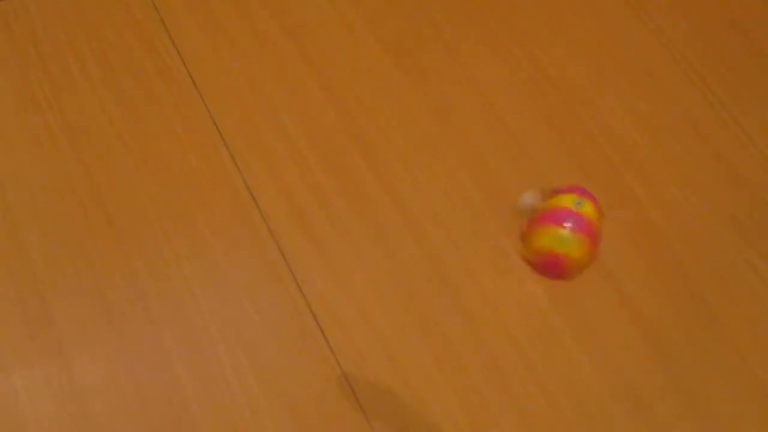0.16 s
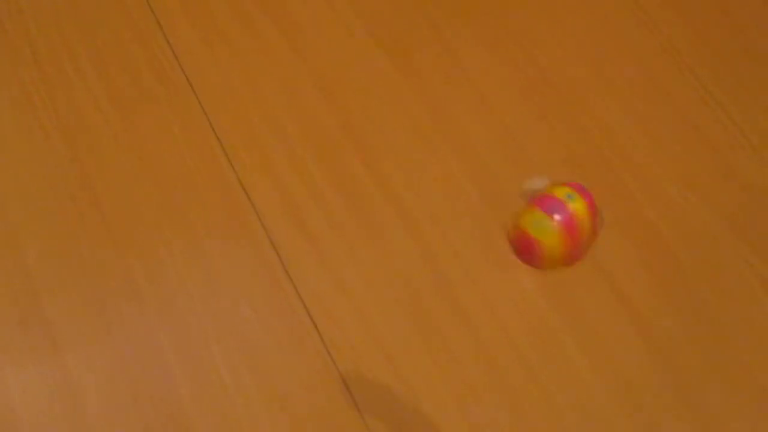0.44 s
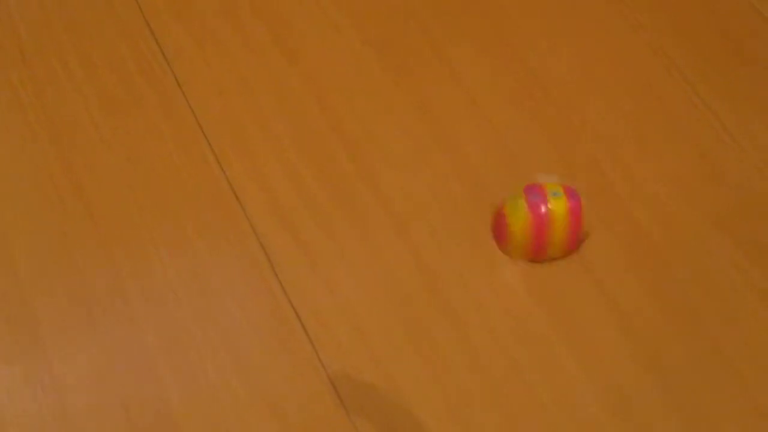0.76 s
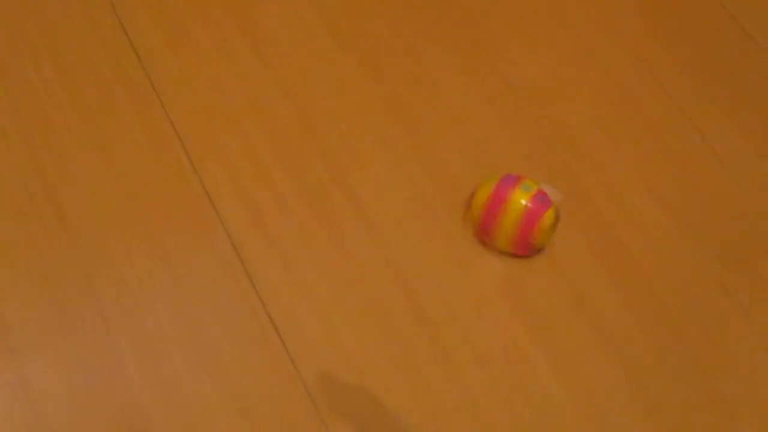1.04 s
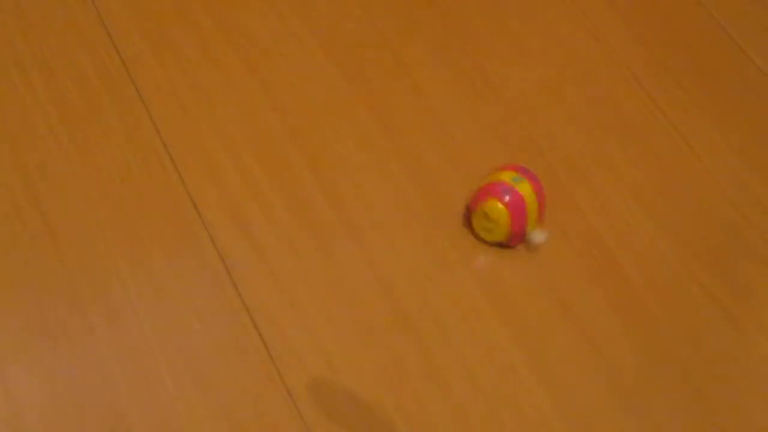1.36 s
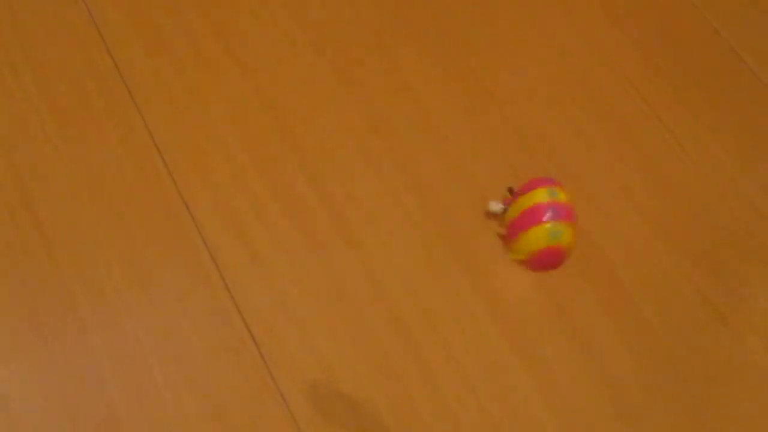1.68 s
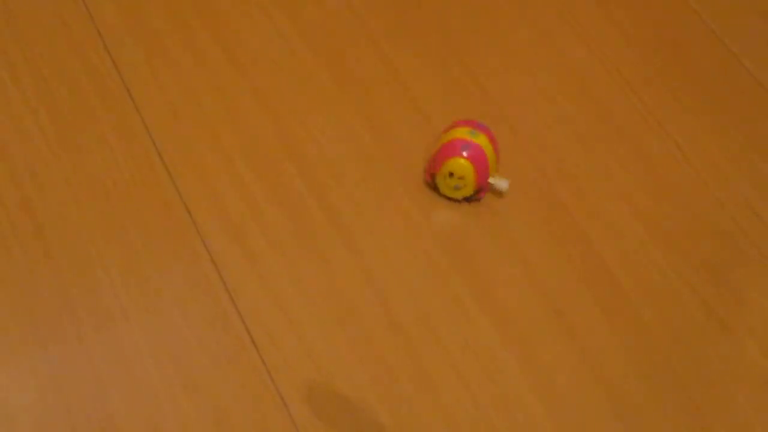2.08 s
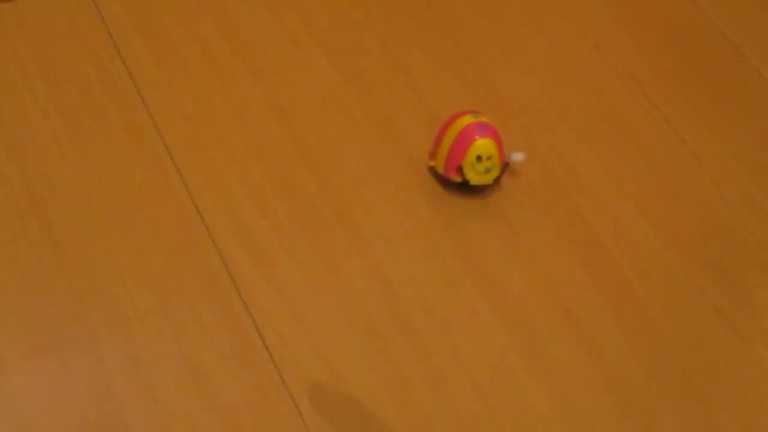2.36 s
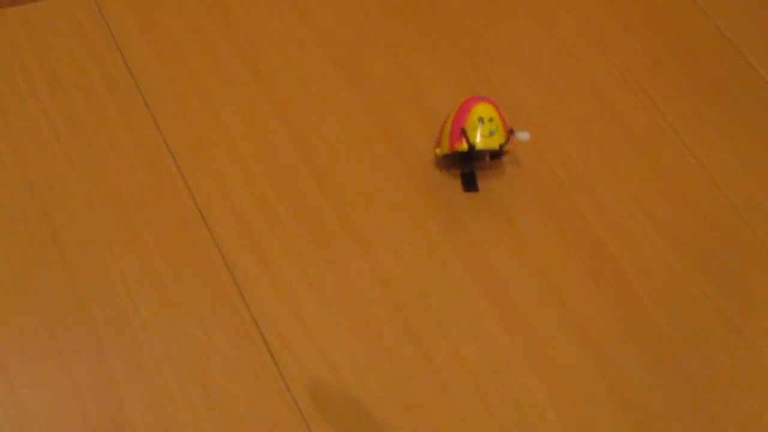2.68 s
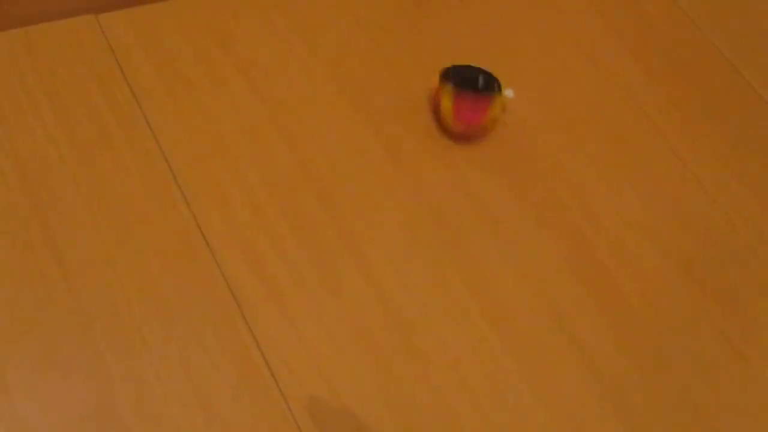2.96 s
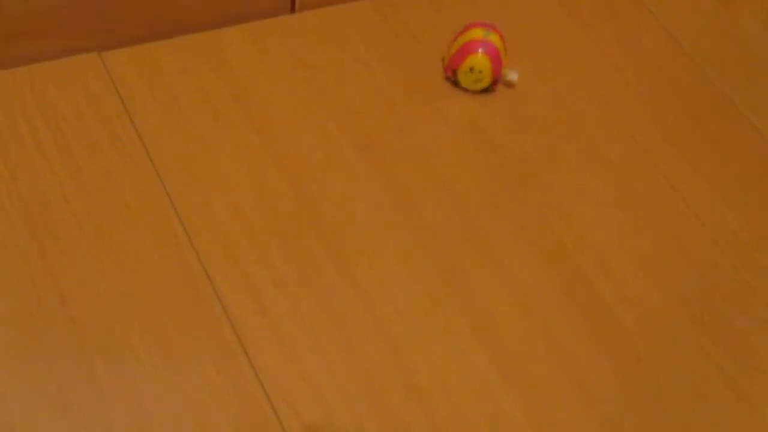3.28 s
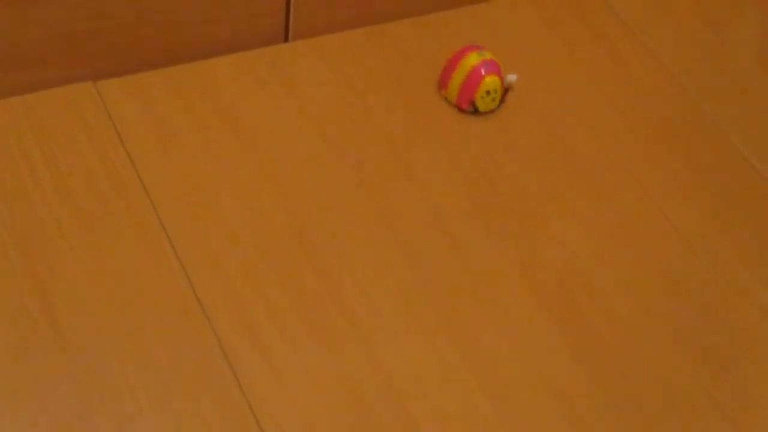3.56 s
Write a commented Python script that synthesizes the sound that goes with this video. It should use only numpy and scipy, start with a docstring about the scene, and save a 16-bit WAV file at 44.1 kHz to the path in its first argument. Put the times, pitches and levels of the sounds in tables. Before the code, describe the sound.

Close mono pickup of a clockwork toy's steady harsh whirr and faint wheel bumps on wood, then a loud crack, a slightly ducked whirr, a hard plastic knock on landing, and more whirring over low room tone.

```python
"""A clockwork toy runs in circles on a wooden table: gear clicks excite a bright hiss, shell and table modes.
Its wheels bump as it rolls, as decaying struck modes; at 2.1 s it rears up and the mode balance shifts.
At 2.7 s a sprung lever snaps, as noise cracks; a limiter ducks all sound and recovers slowly.
It tumbles and lands with a knock near 3.1 s, then whirrs on. Low noise gives a faint room tone throughout."""
import sys
import numpy as np
from scipy import signal
from scipy.fft import rfft, irfft
from scipy.io import wavfile
from scipy.ndimage import map_coordinates

SR = 44100
rng = np.random.default_rng(int(sys.argv[2]) if len(sys.argv) > 2 else 0)


def wav_record(signal):
    """Record a signal, one row per channel, as 16-bit PCM in the file named by sys.argv[1]."""
    frames = np.transpose(np.atleast_2d(signal))
    bounded = np.clip(frames, -1, 1)
    # unit amplitude maps onto the largest positive 16-bit level
    quanta = np.round(bounded * 32767).astype(np.int16)
    wavfile.write(sys.argv[1], SR, quanta)


N = 164493

# Whirr loudness. Each row: time in seconds, rms of gear hiss in dB, level of shell ring in dB,
# level of table rumble in dB.
WHIRR_LEVELS = [(0.0, -22, -31.5, -41), (0.09, -20.5, -35, -48.5), (0.17, -23, -33, -51.5),
                (0.21, -20, -32, -42), (0.31, -25, -35.5, -47.5), (0.42, -22.5, -33, -45.5),
                (0.48, -22.5, -35.5, -45.5), (0.71, -22.5, -35.5, -47), (0.78, -20.5, -37, -44.5),
                (0.84, -23.5, -34.5, -45.5), (0.89, -20, -34.5, -41), (0.94, -21.5, -35, -43),
                (0.99, -26, -37.5, -48), (1.04, -19.5, -36, -46.5), (1.08, -23, -35.5, -46),
                (1.14, -24, -36, -50), (1.18, -21.5, -35.5, -46), (1.29, -24, -36, -50),
                (1.34, -23.5, -38, -39.5), (1.42, -26, -37, -45.5), (1.49, -22.5, -37.5, -46),
                (1.73, -23, -38.5, -45), (1.96, -22.5, -35, -44.5), (2.03, -24.5, -36, -41.5),
                (2.09, -22, -35.5, -42.5), (2.19, -24.5, -33, -52.5), (2.36, -24, -32.5, -54),
                (2.41, -24.5, -33.5, -49.5), (2.56, -23.5, -31.5, -52.5), (2.67, -22, -32, -53.5),
                (2.81, -24, -36, -46), (2.85, -23, -35, -37), (2.93, -22.5, -29.5, -51),
                (3.02, -23.5, -28.5, -55.5), (3.12, -21, -30.5, -46), (3.17, -24, -32.5, -41),
                (3.26, -21, -33, -42), (3.31, -21.5, -36, -47.5), (3.42, -20.5, -38, -52),
                (3.46, -23, -37, -51.5), (3.66, -21.5, -34, -47.5), (3.73, -20.5, -38.5, -48)]
# Tooth rate of the fastest gear. Each row: time in seconds, rate in Hz.
TOOTH_RATE = [(0, 224.6), (.5, 208.6), (.85, 225.5), (1.3, 205), (1.6, 197.8), (2.0, 197.8), (2.2, 205.6),
              (2.5, 206), (2.7, 215), (2.9, 174), (3.25, 221.4), (3.73, 212.3)]
# Gear hiss spectrum. Each row: frequency in Hz, relative density in dB per Hz.
GEAR_HISS_SPECTRUM = [(2240, -58), (3800, -26), (4540, -15), (5650, -14), (7110, -8.5), (7770, -3.5),
                      (9330, 0.5), (10800, -2), (13300, -16), (15600, -25)]
# Shell modes. Each row: frequency in Hz, width in Hz, relative level in dB when rolling, reared,
# in the air, after landing.
SHELL_MODES = [(1467, 58, -1, -18.5, -15, -1), (1574, 33, 0.5, -10.5, -11, -1.5),
               (1652, 24, -3.5, -1.5, -22, 0), (1768, 74, -1.5, -4, -4.5, 0.5),
               (1881, 54, -3.5, -7.5, -0.5, -2), (1999, 54, -7.5, -3.5, 6, 3), (2137, 78, -7, -9, -2, 3),
               (2380, 190, -9.5, -12, -10.5, -3.5), (2780, 64, -9.5, -8, -7, -9),
               (2940, 73, -21, -13.5, -18, -12), (3140, 550, -12, -18, -15.5, -6.5),
               (4200, 1100, -17, -24, -37, -13), (4670, 385, -9, -8, -13, -3),
               (5330, 28, -23.5, -7, -6, -17), (6680, 130, -4, -0.5, -4.5, 2)]
# Start level of each shell mode above its rolling level. Each entry: offset in dB.
SHELL_LIFT_DB = [-2, 7, 8, 6, 7, 4.5, -6, -3, 0.5, -2, 0, -5, -6, -2, -6]
# Table modes. Each row: frequency in Hz, width in Hz, relative level in dB when rolling, reared,
# in the air, after landing.
TABLE_MODES = [(400, 100, -24, -14.5, -13, -10.5), (596.6, 133, 0, -4.5, 3, -3),
               (612.3, 18, -8, 5.5, -24, -20), (774, 25, -1, 0, -3, 5), (803, 11, -52, 4, -22, -20),
               (931, 130, -4, -5.5, -7, 1.5), (1107, 107, 1.5, -6, -4, 0.5),
               (1294, 170, 2, -7.5, -7.5, 0.5)]
# Wheel bumps while rolling. Each row: start in seconds, peak of the modal ring in dB.
WHEEL_BUMPS = [(0.08, -20), (0.113, -22), (0.195, -17.5), (0.609, -18), (0.87, -32), (1.024, -25),
               (1.058, -23), (1.152, -18), (1.23, -18), (1.25, -26), (1.305, -20), (1.535, -30)]
# Shell hits on the table. Each row: start in seconds, peak of the modal ring in dB.
SHELL_KNOCKS = [(3.115, -17.5), (3.1301, 3.5), (3.195, -21), (3.2163, -9), (3.226, -35), (3.241, -24)]
# Modes rung by a blow. Each row: frequency in Hz, mean relative level in dB, T60 in seconds.
STRUCK_MODES = [(200, 10, 0.018), (602, -3, 0.079), (740, 1, 0.027), (1050, -8, 0.026), (1420, 3, 0.064),
                (1590, 21, 0.048), (1700, 11, 0.013), (1930, 16, 0.027), (2310, 13, .012),
                (2520, 22, 0.0097), (3430, 24, .007), (3850, 21, 0.0085), (4470, 4, 0.0054),
                (6640, 0, .006)]
# Returns of each blow from nearby surfaces. Each row: delay in seconds, level in dB.
BLOW_RETURNS = [(.0056, -21), (.0112, -14.5)]
# Lever snaps. Each row: start in seconds, peak in dB.
LEVER_SNAPS = [(2.7117, 3), (2.729, 9), (2.7355, -7)]
# Snap spectrum. Each row: frequency in Hz, relative density in dB per Hz.
SNAP_SPECTRUM = [(290, -59), (500, -21.5), (954, -46), (1850, -7.5), (2360, -10.5), (3060, -22.5),
                 (5670, -16), (7780, -0.5), (11600, -6), (15500, -25)]
# Room tone spectrum. Each row: frequency in Hz, relative density in dB per Hz.
ROOM_SPECTRUM = [(12, -38), (20, 3.5), (75, 1.5), (163, 2), (308, -3.5), (351, -2), (390, -4.5), (450, 0.5),
                 (580, -78), (990, -120)]

CONTACTS_PER_S, SIZE_SPREAD_DB, CHATTER_DB = 11000., 1.26, 0.46
TOOTH_DEPTH, TOOTH_JITTER = 0.23, 0.031  # shares
STRAND_WIDTH_HZ, STRAND_DB, STRAND_SWING_DB, STRAND_RATE_HZ = 87, -10, 6, 2.8
HISS_FLICKER_DB = 1.9
STRAND_GLIDE_SHARE, STRAND_GLIDE_HZ = 0.017, 2.9
ECHO_S, ECHO_SWING_S, ECHO_RATE_HZ, ECHO_DB = .0012, .00008, 2.25, -12
REAR_S, FLIP_S, LAND_S = 2.082, 2.8, 3.15  # rears up, leaves the table, lands
TURN_S = .045  # half of a posture change
SETTLE_S = 2.04
SHELL_PATCH_DB, TABLE_PATCH_DB = 1, 1
MODE_WAVER_SHARE, MODE_WAVER_HZ = .007, 3.0
BUMP_CUT_HZ, KNOCK_CUT_HZ, BLOW_HIGHPASS_HZ = 1100, 39000, 535
CLATTER_HZ, CLATTER_WIDTH_HZ, CLATTER_DB, CLATTER_T60_S = 1520, 650, -22, 0.19
SNAP_RISE_S, SNAP_T60_S, SNAP_TAIL_DB, SNAP_TAIL_T60_S = 0.0007, 0.01, -22, 0.23
ROOM_DB = -62.5
CEILING_DB, ATTACK_S, RELEASE_DB_PER_S = -4, 0.0012, 7
CUTOFF_HZ = 15750


def contacts():
    """Dense uneven clicks of teeth and loose axles, swelling once per tooth."""
    rate_hz, = in_time(TOOTH_RATE)
    phase = 2 * np.pi * np.cumsum(rate_hz * (1 + TOOTH_JITTER * drift(25.8))) / SR
    sizes = from_db(SIZE_SPREAD_DB * np.minimum(rng.exponential(1, N), 6.5))
    sizes = sizes * rng.choice([-1, 1], N)
    hits = rng.random(N) < CONTACTS_PER_S / SR
    swell = 1 + TOOTH_DEPTH * np.sin(phase)
    return hits * sizes * swell * from_db(CHATTER_DB * drift(21))


def gear_hiss(clicks):
    """Broad rasp plus small gear-frame resonances that come, go and slide together as the toy turns."""
    strands = np.zeros(N)
    for hz in np.linspace(4300, 15300, 36) + rng.uniform(-100, 100, 36):
        gain_db = STRAND_SWING_DB * drift(STRAND_RATE_HZ) + HISS_FLICKER_DB * drift(23)
        strands += from_db(gain_db) * resonance(clicks, hz, STRAND_WIDTH_HZ)
    strands = waver(rms_one(strands), STRAND_GLIDE_SHARE, STRAND_GLIDE_HZ)
    return coloured(rms_one(clicks) + from_db(STRAND_DB) * strands, GEAR_HISS_SPECTRUM)


def table_bounce(x):
    """Adds a table-top reflection; its path changes as the toy turns, sliding ridges through the treble."""
    lag = (ECHO_S + ECHO_SWING_S * drift(ECHO_RATE_HZ)) * SR
    return rms_one(x + from_db(ECHO_DB) * map_coordinates(x, [np.arange(N) - lag], order=3))


def body(clicks, modes, lift_db, patch_db, top_hz):
    """Click-driven modes, balanced by posture; nominal power of those under top_hz is held even."""
    t = np.arange(N) / SR
    at_s = [0, SETTLE_S, REAR_S - TURN_S, REAR_S + TURN_S,
            FLIP_S - TURN_S, FLIP_S + TURN_S, LAND_S - TURN_S, LAND_S + TURN_S]
    out, power = np.zeros(N), np.zeros(N)
    for k, (up, (hz, width_hz, rolling, reared, air, landed)) in enumerate(zip(lift_db, modes)):
        levels_db = [rolling + up, rolling, rolling, reared, reared, air, air, landed]
        gain = from_db(np.interp(t, at_s, levels_db))
        power += gain ** 2 * width_hz * (hz < top_hz)
        # two wider passes give about the listed width
        ring = resonance(resonance(clicks, hz, 1.5 * width_hz), hz, 1.5 * width_hz)
        ring = waver(ring, MODE_WAVER_SHARE, MODE_WAVER_HZ)
        out += (-1) ** k * gain * from_db(patch_db * drift(5)) * ring
    return out / np.sqrt(power) / np.std(clicks) * np.sqrt(SR) / 2


def whirr():
    """Gear contacts heard as hiss, shell ring and table rumble, all from the same clicks."""
    hiss_db, shell_db, table_db = in_time(WHIRR_LEVELS)
    clicks = contacts()
    hiss = table_bounce(gear_hiss(clicks))
    shell = body(clicks, SHELL_MODES, SHELL_LIFT_DB, SHELL_PATCH_DB, top_hz=4000)
    table = body(clicks, TABLE_MODES, np.zeros(len(TABLE_MODES)), TABLE_PATCH_DB, top_hz=4000)
    return from_db(hiss_db) * hiss + from_db(shell_db) * shell + from_db(table_db) * table


def blows(events, cut_hz):
    """Each blow rings the struck modes, echoes and clatters; a softer contact has a lower cut."""
    t, out = np.arange(SR // 5) / SR, np.zeros(N + SR)
    hz, db, t60_s = np.transpose(STRUCK_MODES)[:, :, None]
    softness = np.sqrt(1 + (hz / cut_hz) ** 4)
    for s, peak_db in events:
        chance_db = rng.normal(0, 1.5, (len(STRUCK_MODES), 1))
        partials = from_db(db + chance_db - 60 * t / t60_s) * np.sin(2 * np.pi * hz * t) / softness
        ring = partials.sum(axis=0)
        ring = ring / np.abs(ring).max()
        echoes = sum(from_db(echo_db) * np.roll(ring, int(delay_s * SR))
                     for delay_s, echo_db in BLOW_RETURNS)
        noise = resonance(rng.standard_normal(len(t)), CLATTER_HZ, CLATTER_WIDTH_HZ)
        clatter = rms_one(resonance(noise, CLATTER_HZ, CLATTER_WIDTH_HZ))
        clatter = clatter * from_db(CLATTER_DB - 60 * t / CLATTER_T60_S)
        start = int(s * SR)
        out[start:start + len(t)] += from_db(peak_db) * (ring + echoes + clatter)
    highpass = signal.butter(3, BLOW_HIGHPASS_HZ, "high", fs=SR, output="sos")
    return signal.sosfilt(highpass, out[:N] + 1e-18)


def snaps():
    """Sprung lever: bright noise cracks with a fast decay and a weaker, slower rattle."""
    t, out = np.arange(SR // 5) / SR, np.zeros(N + SR)
    decay = from_db(-60 * t / SNAP_T60_S) + from_db(SNAP_TAIL_DB - 60 * t / SNAP_TAIL_T60_S)
    envelope = np.minimum(t / SNAP_RISE_S, 1) * decay
    for s, peak_db in LEVER_SNAPS:
        crack = coloured(rng.standard_normal(len(t)), SNAP_SPECTRUM) * envelope
        start = int(s * SR)
        out[start:start + len(t)] += from_db(peak_db) * crack / np.abs(crack).max()
    return out[:N]


def room_tone():
    """Steady low noise of the room."""
    return from_db(ROOM_DB) * coloured(rng.standard_normal(N), ROOM_SPECTRUM)


def from_db(db):
    """Gain of a level in dB."""
    return 10 ** (np.asarray(db) / 20)


def rms_one(x):
    """Scaled to rms 1."""
    return x / np.sqrt(np.mean(x ** 2) + 1e-20)


def in_time(rows):
    """Columns of a curve, one value a sample."""
    s, *columns = np.transpose(rows)
    return [np.interp(np.arange(N) / SR, s, c) for c in columns]


def drift(rate_hz):
    """Slow random wander of rms 1: noise through a double pole, run at SR / 40."""
    r = np.exp(-80 * np.pi * rate_hz / SR)
    noise = rng.standard_normal(N // 40 + 2002)
    slow = signal.lfilter([1], [1, -2 * r, r * r], noise)[2000:]
    return np.interp(np.arange(N) / 40, np.arange(len(slow)), rms_one(slow))


def waver(x, share, rate_hz):
    """Read at a wandering speed, so its pitch slides up and down."""
    speed = share * drift(rate_hz)
    place = np.arange(N) + np.cumsum(speed - speed.mean())
    return map_coordinates(x, [place], order=3, mode="mirror")


def coloured(x, spectrum):
    """Gives a flat signal the spectrum; rms 1."""
    hz, db = np.transpose(spectrum)
    grid_hz = np.maximum(np.arange(len(x) // 2 + 1) * SR / len(x), 1)
    gain = from_db(np.interp(np.log(grid_hz), np.log(hz), db))
    return rms_one(irfft(rfft(x) * gain, len(x)))


def resonance(x, hz, width_hz):
    """Two-pole band of gain about 1 at its top."""
    r = np.exp(-np.pi * width_hz / SR)
    feed = np.array([1, 0, -1]) * (1 - r * r) / 2
    return signal.lfilter(feed, [1, -2 * r * np.cos(2 * np.pi * hz / SR), r * r], x)


def scene():
    """Whirr, blows, snaps and room tone, in mono."""
    hits = blows(WHEEL_BUMPS, BUMP_CUT_HZ) + blows(SHELL_KNOCKS, KNOCK_CUT_HZ)
    return (whirr() + hits + snaps() + room_tone())[None]


def record(dry):
    """Look-ahead limiter with fast attack and slow release in dB per second, then a steep lowpass."""
    fall_db = RELEASE_DB_PER_S * np.arange(N) / SR
    over_db = np.maximum(20 * np.log10(np.abs(dry[0]) + 1e-9) - CEILING_DB, 0)
    held_db = np.maximum.accumulate(np.where(over_db > 0, over_db + fall_db, -99)) - fall_db
    held_db = np.maximum(held_db, 0)
    r = np.exp(-1 / (max(ATTACK_S, 1e-4) * SR))
    ahead_db = np.roll(held_db, -int(ATTACK_S * SR) * 2)
    cut_db = signal.lfilter([1 - r], [1, -r], ahead_db)
    lowpass = signal.ellip(14, .5, 70, CUTOFF_HZ, fs=SR, output="sos")
    return signal.sosfilt(lowpass, dry * from_db(-cut_db))


dry = scene()
out = record(dry)
wav_record(out)
```